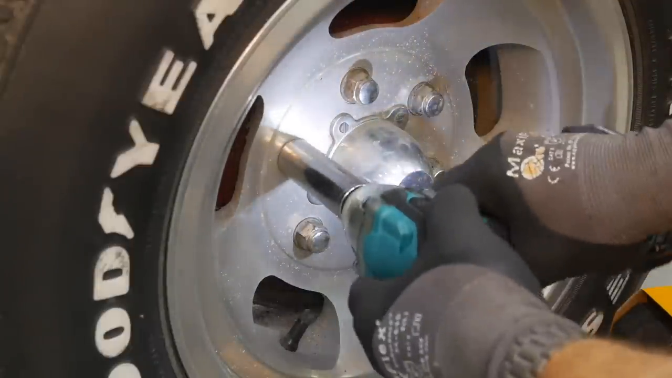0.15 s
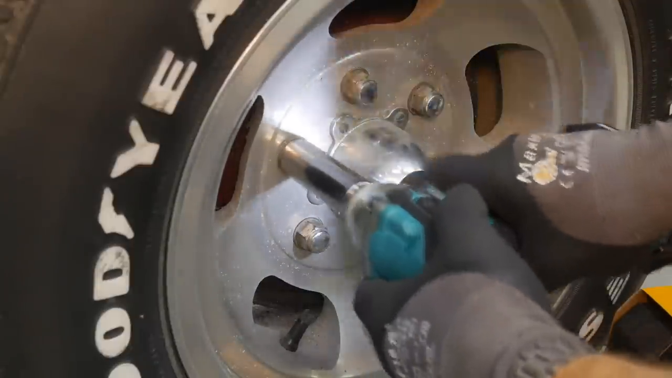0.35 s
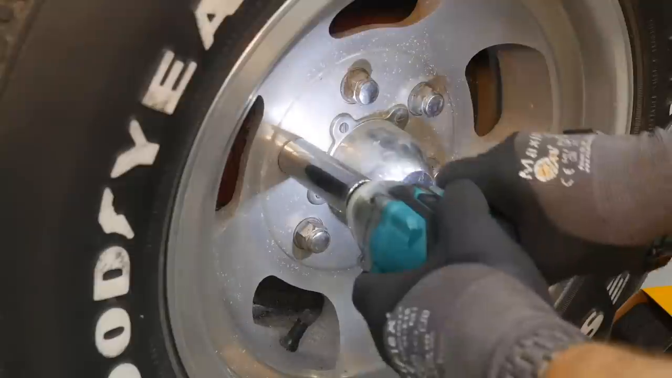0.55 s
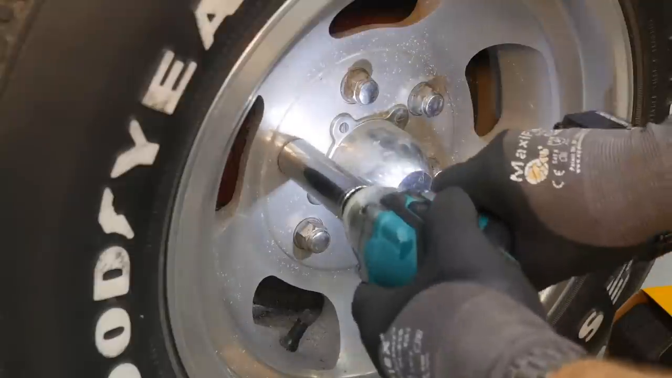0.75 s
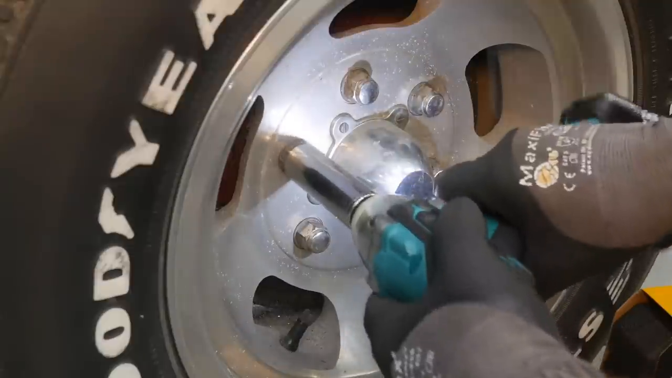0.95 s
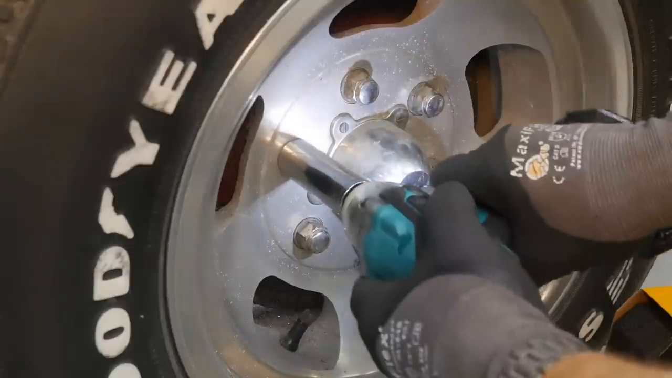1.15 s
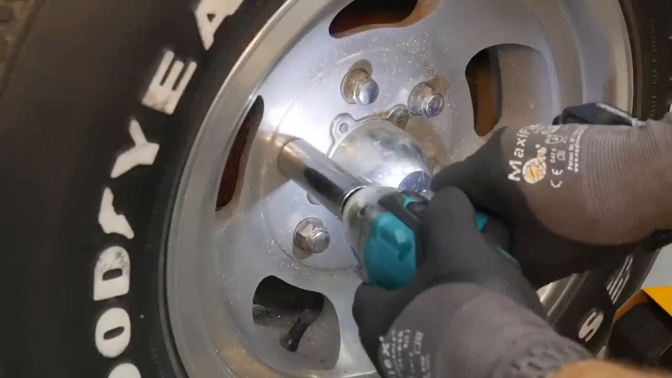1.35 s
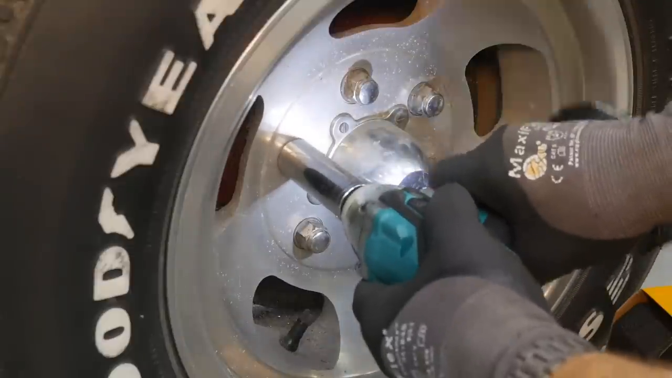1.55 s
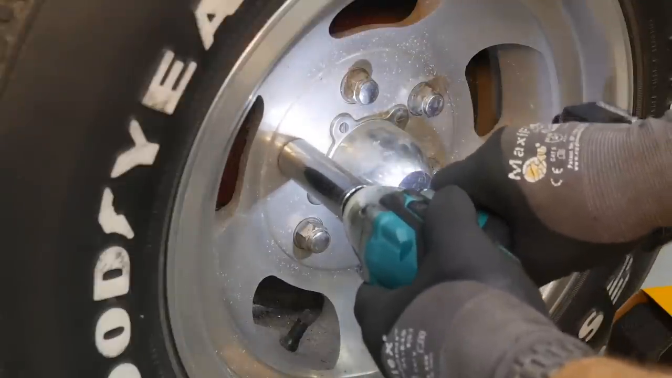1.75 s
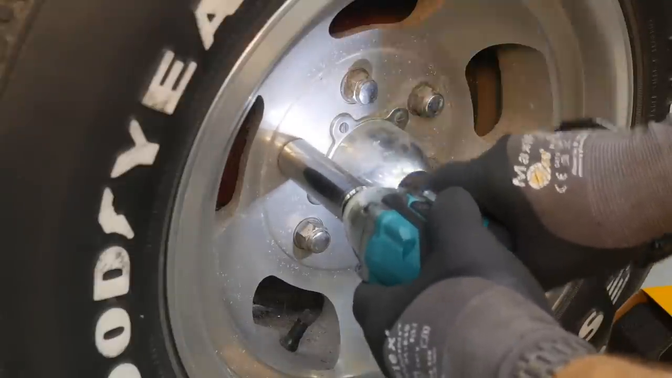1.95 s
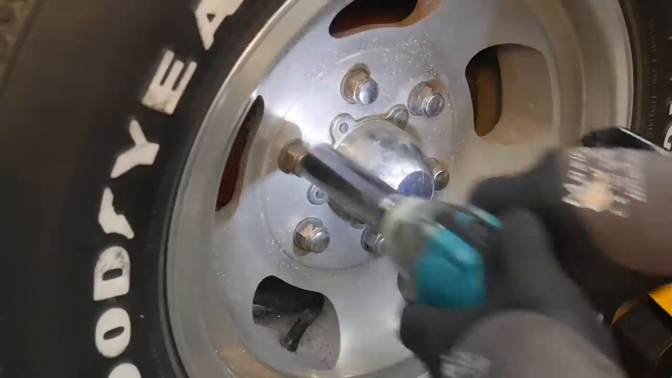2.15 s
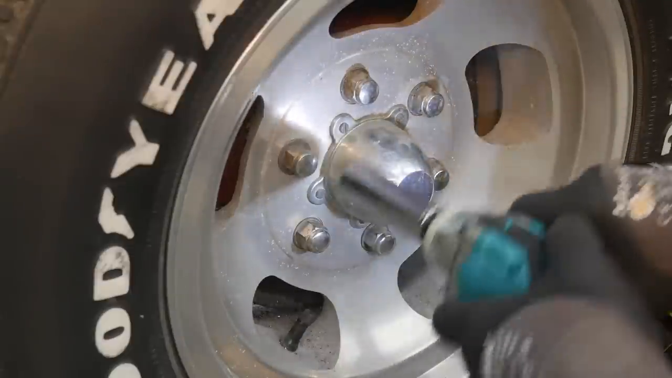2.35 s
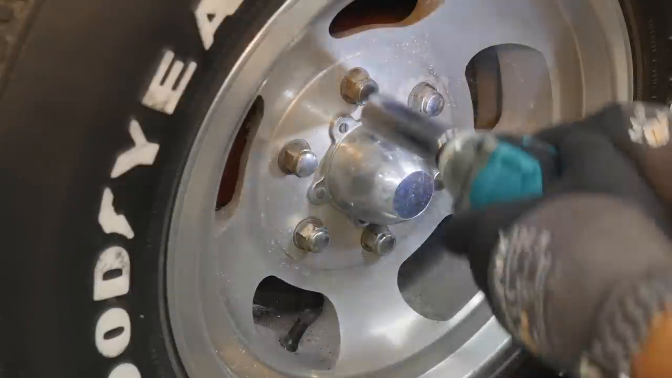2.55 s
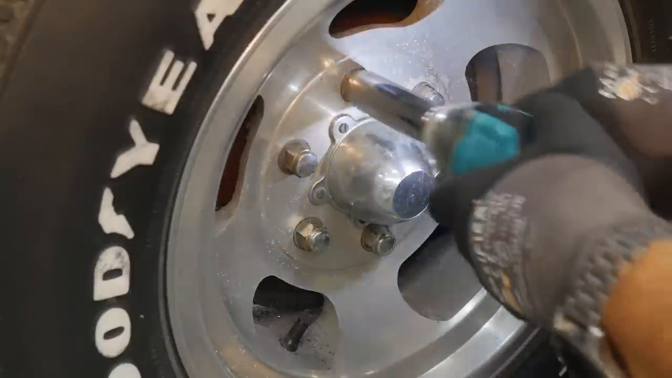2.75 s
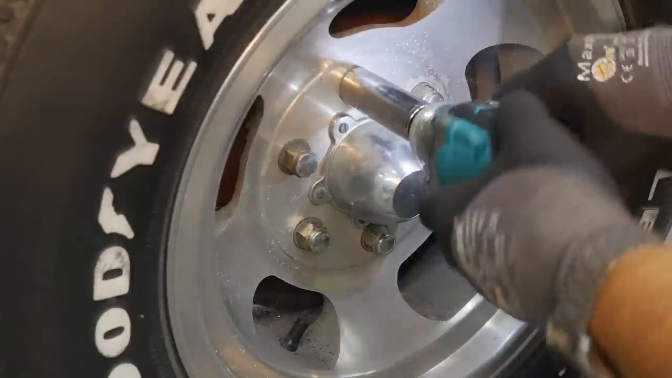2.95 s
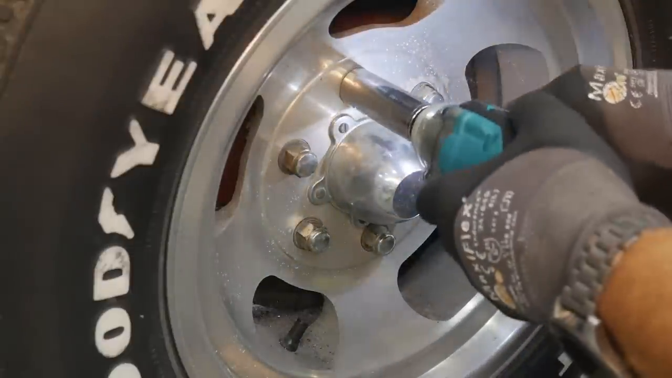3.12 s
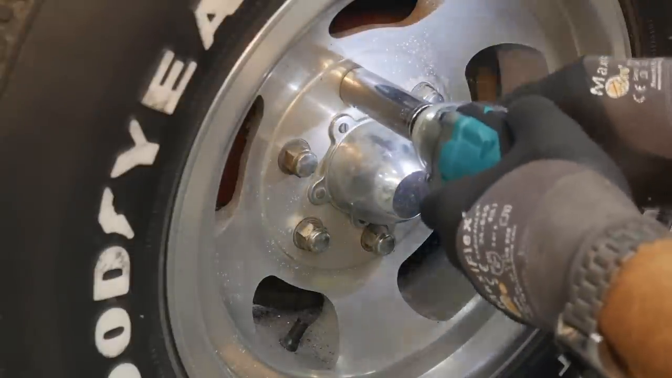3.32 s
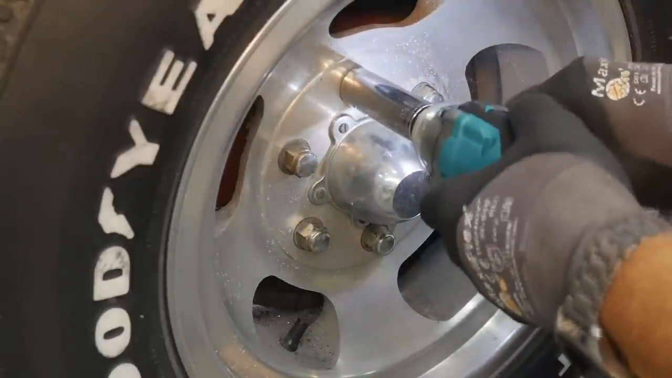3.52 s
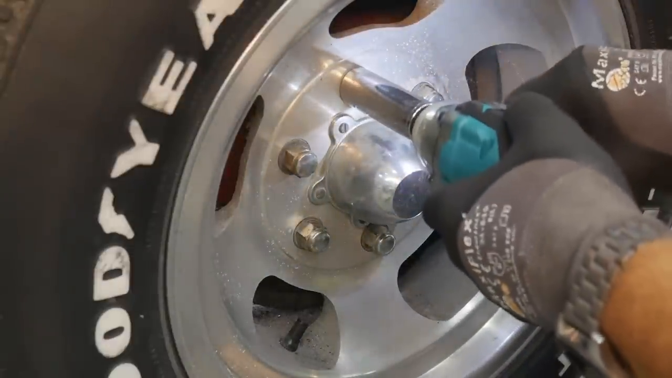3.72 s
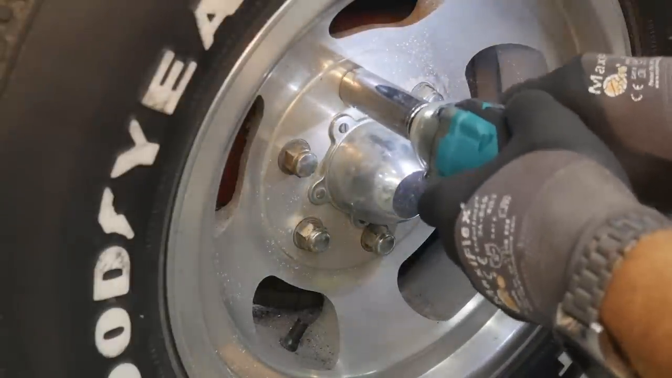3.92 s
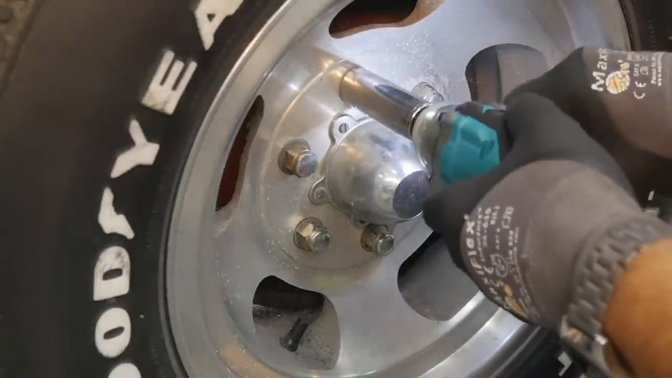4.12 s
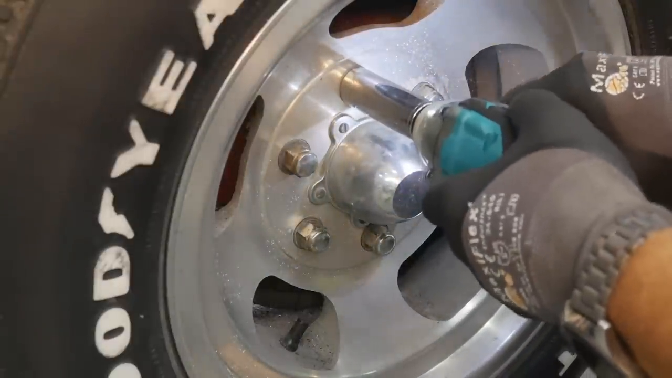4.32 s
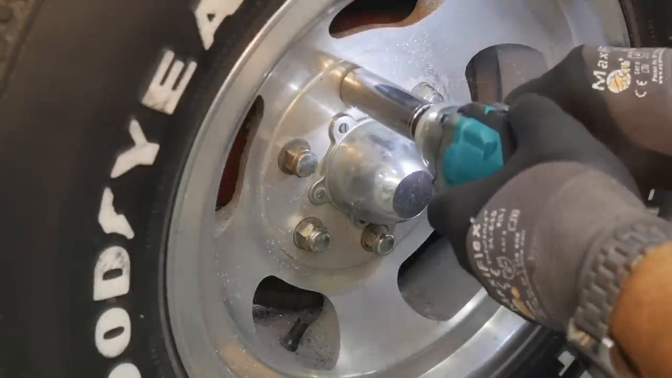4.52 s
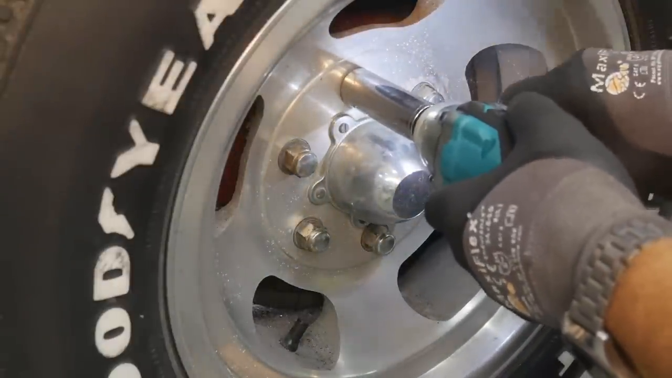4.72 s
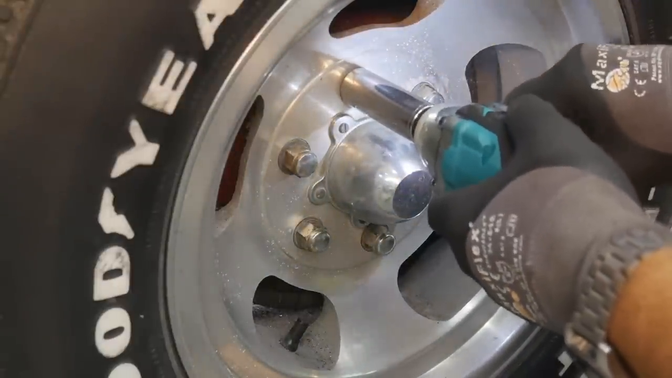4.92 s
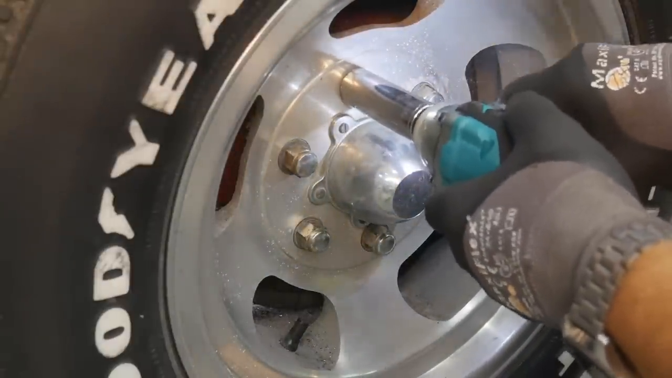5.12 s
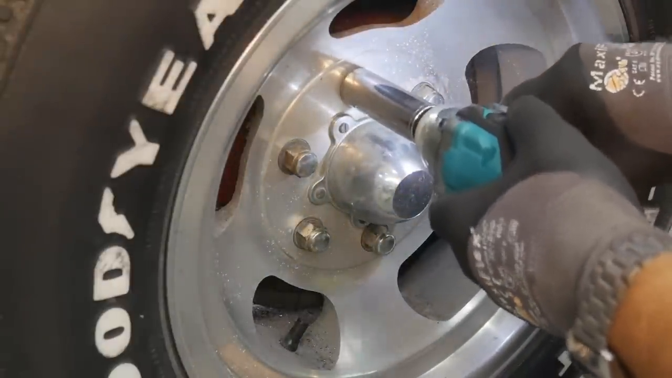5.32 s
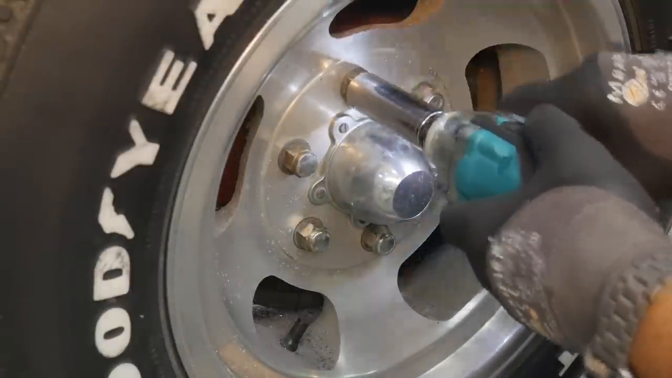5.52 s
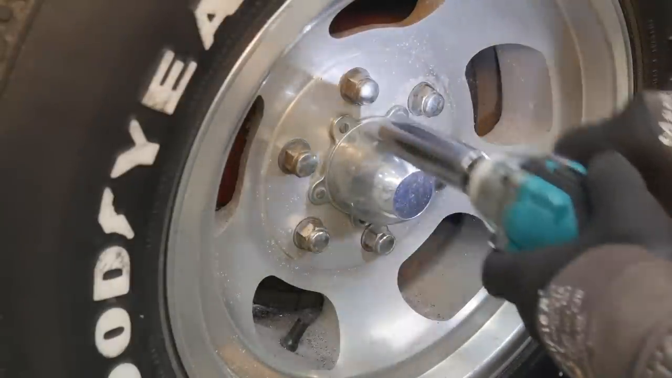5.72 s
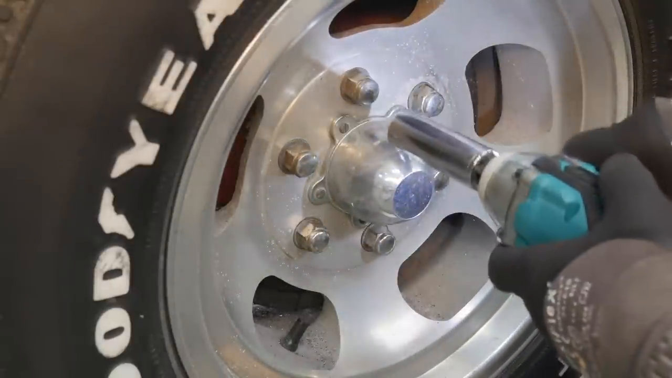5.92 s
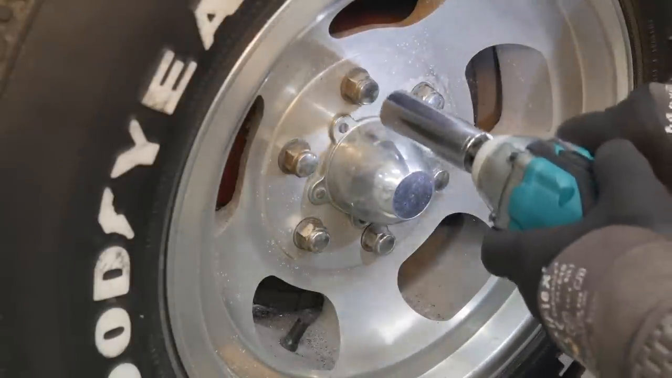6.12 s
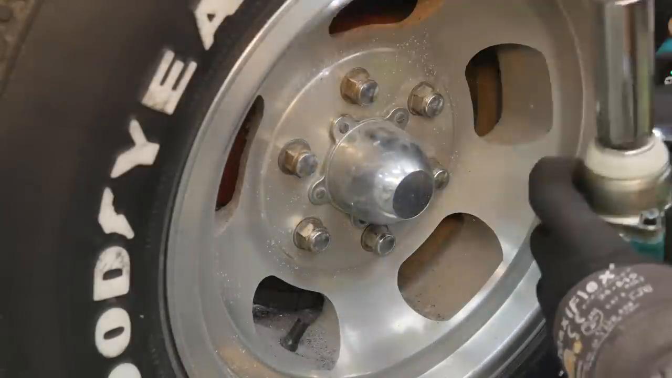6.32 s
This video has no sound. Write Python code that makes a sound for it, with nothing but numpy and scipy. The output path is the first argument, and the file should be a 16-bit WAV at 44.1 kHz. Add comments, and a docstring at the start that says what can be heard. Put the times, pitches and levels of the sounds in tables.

```python
"""Impact wrench on a wheel

A cordless impact wrench tightens two nuts of an alloy wheel, in four and then six short bursts, in a workshop.
Filtered grains of metal contact, pulsed by the hammer, make the clatter; socket, wheel and rim are resonances.
Decaying noise tails throw the bursts back from the room. Between the nuts the socket pings and knocks
as it is pulled off and seated again: short noise ticks, hollow body modes and decaying sines.
A faint falling groan at the start, motor whine, glove rubs, room air and faint tones fill in the rest."""
import sys
import numpy as np
from scipy import signal
from scipy.fft import rfft, irfft
from scipy.io import wavfile

SR = 44100
rng = np.random.default_rng(int(sys.argv[2]) if len(sys.argv) > 2 else 0)


def to_wav(s):
    """Save 16-bit WAV."""
    ch = np.atleast_2d(s).T  # columns
    pcm = np.round(np.clip(ch, -1, 1) * 32767)  # PCM
    wavfile.write(sys.argv[1], SR, pcm.astype(np.int16))


N = 280720
TIME = np.arange(N) / SR

# Trigger pulls; the ring moves down from socket to wheel as the nut seats. Blows keep step with phase_s:
# [start_s, end_s, attack_s, force_db (before the swell), thud_db, catch_db, phase_s, blows_per_s,
#  dip_db (between blows), ring_hz, ring_db, treble_db]
BURSTS = [(0.066, .275, 0.0085, -27, -1, -35, 0.088, 35, 0.5, 4230, -1, -7),
          (0.682, 0.955, 0.024, -27.5, .5, -43, 0.7, 30.4, 0.2, 1070, 3.5, -4.5),
          (1.261, 1.516, 0.031, -27, 0, -46.5, 1.45, 35.75, 1.5, 1080, 2, -2),
          (1.672, 1.873, 0.031, -27.5, 0, -47.5, 1.707, 40, 1, 1100, 2, -3.5),
          (3.208, 3.328, 0.082, -25, -1, -32, 3.225, 52.25, 9, 5150, 6, -5.5),
          (3.522, 3.823, 0.03, -27, -4, -32.5, 3.9, 33, 5.5, 3960, 5.5, -5),
          (4.028, 4.236, 0.009, -27, -3.5, -41.5, 4.044, 41.5, 5, 3340, 7, -1.5),
          (4.396, 4.652, 0.014, -26.5, -3, -38, 4.427, 25.5, 3, 2960, 2, -3),
          (4.818, 5.08, 0.031, -26.5, -2.5, -40, 4.5, 30.6, 3.5, 2040, 4, -2),
          (5.232, 5.465, 0.02, -27, -3.5, -32.5, 5.26, 24.7, 2.5, 1900, 6, -.5)]
# Modes of anvil and socket under load: [pitch_hz, width_hz, first_nut_db, second_nut_db]
SOCKET_MODES = [(410, 28, 4, -10), (1300, 75, -3, -22), (1710, 120, 1, -21.5), (2425, 30, -24, -5.5),
                (3170, 68, 6, -3.5), (3595, 72, 2, 8.5), (3830, 56, 4.5, -9.5), (4430, 100, 5.5, 8.5),
                (4570, 100, 3, -11.5), (4900, 68, 9.5, 9), (6650, 240, 0.5, 3), (8720, 350, 9, -3),
                (10300, 190, 2, -0.5), (11410, 160, -12, -18.5), (12200, 440, 1, -13)]


def amp(db):
    """Decibels to gain."""
    return 10 ** (np.asarray(db) / 20)


def unit(x):
    """Scales to rms 1."""
    return x / np.sqrt(np.mean(x ** 2) + 1e-20)


def unit_energy(x):
    """Scales to energy 1, so that an impulse response keeps the level of what drives it."""
    return x / np.linalg.norm(x)


def read(points, hz):
    """Reads a table on a log-frequency axis."""
    f, value = np.transpose(points)
    return np.interp(np.log(hz + 1), np.log(f), value)


def add(mix, s, sound):
    """Mixes a sound in at s seconds."""
    part = mix[max(round(s * SR), 0):][:len(sound)]
    part += sound[:len(part)]


def noise(spectrum, size):
    """Noise of rms 1 with the given spectrum."""
    white = rfft(rng.standard_normal(size))
    gain = amp(read(spectrum, np.fft.rfftfreq(size, 1 / SR)))
    return unit(irfft(white * gain, size))


def decay(t, t60):
    """Exponential decay that falls by 60 dB in t60 seconds."""
    return np.exp(-np.log(1000) * t / t60)


def ring(hz, t60, t):
    """One dying mode."""
    return np.sin(2 * np.pi * hz * t) * decay(t, t60)


def causal(gain, size=4096):
    """The sharpest impulse response that has this gain on the bins of an FFT."""
    both_sides = np.r_[gain, gain[-2:0:-1]]
    log_gain = np.log(np.maximum(both_sides, 1e-5))
    minimum_phase = np.exp(np.conj(signal.hilbert(log_gain)))
    return irfft(minimum_phase[:size // 2 + 1])


def contacts(size, per_s=9000, spread_db=-1.0):
    """Dense tiny metal contacts of uneven strength and random sign."""
    hits = rng.random(size) < per_s / SR
    strength = amp(spread_db * rng.standard_normal(size))
    return unit(hits * rng.choice([-1, 1], size) * strength)


def room_tail(spectrum, build_s=0.019):
    """A diffuse echo of energy 1 that builds up softly and dies at its own rate in each band."""
    # Reverberation of the workshop: [pitch_hz, t60_s]
    room_decay = [(60, 0.43), (200, 1), (450, 0.86), (1400, 0.94), (3000, 0.91), (5500, 0.84), (8000, 0.68),
                  (11000, 0.59), (16000, 0.24)]
    hz, t, bands = signal.stft(noise(spectrum, size=SR * 3 // 2), SR, nperseg=256)
    bands = bands * decay(t, read(room_decay, hz)[:, None])
    tail = signal.istft(bands, SR, nperseg=256)[1]
    tail *= 1 - np.exp(-TIME[:len(tail)] / build_s)
    return unit_energy(tail)


def workshop(waver_hz=1.5, waver_db=6.0, fade_s=.06, air_db=-67.5):
    """Shaped noise for room air, and faint sine tones with a slight random waver in pitch and level."""
    # Colour of the room air: [pitch_hz, density_db (per Hz)]
    air_spectrum = [(20, -16.5), (50, -6), (90, -4.5), (150, -7), (250, -12), (450, -8.5), (700, -12),
                    (1000, -19.5), (1600, -20.5), (3000, -32.5), (6000, -31), (15500, -35.5)]
    # Faint tones, before they waver; the one near 402 Hz is the rim singing:
    # [start_s, end_s, pitch_hz, level_db]
    faint_tones = [(0, 3.8, 148, -76), (0, 4.6, 402.6, -74.5), (5.7, 6.4, 780, -73.5)]
    out = amp(air_db) * noise(air_spectrum, N)
    for start, end, hz, db in faint_tones:
        drift, swell = (noise([(1, 0), (6, 0), (30, -80)], N) for _ in range(2))
        fade = np.clip(np.minimum(TIME - start, end - TIME) / fade_s, 0, 1)
        level = amp(db + waver_db * swell) * fade
        tone = np.sin(2 * np.pi * np.cumsum(hz + waver_hz * drift) / SR)
        out += level * np.sqrt(2) * tone
    return out


def falling_groan(rough=.15, overtone=0.57, rise_s=.01):
    """A faint falling groan at the start: a tone and its octave, roughened by fast pitch noise."""
    # The groan; a negative hold starts the decay ahead of the sound, which lowers its level:
    # [start_s, first_hz, last_hz, glide_s, level_db, hold_s, t60_s]
    groan = (0, 468.5, 129.5, 0.5, -62, -0.5, 1.8)
    start, first_hz, last_hz, glide_s, db, hold_s, t60 = groan
    out, t = np.zeros(N), TIME[:SR // 2]
    hz = last_hz + (first_hz - last_hz) * np.exp(-(t / glide_s) ** 2)
    wobble = noise([(1, 0), (80, 0), (300, -40)], len(t))
    angle = 2 * np.pi * np.cumsum(hz * (1 + rough * wobble)) / SR
    level = amp(db) * (1 - np.exp(-t / rise_s)) * decay(np.maximum(t - hold_s, 0), t60)
    add(out, start, level * unit(np.sin(angle) + overtone * np.sin(2 * angle)))
    return out


def motor(start_hz=7600, end_hz=8400, whine=.35):
    """The motor spins up before the hammer catches: a rising whine over the whirr of the gears."""
    # Spin-ups, which grow towards their level: [start_s, end_s, level_db]
    spin_ups = [(.002, 0.033, -49.5), (0.659, 0.686, -47.5), (1.246, 1.268, -42.5), (3.147, 3.207, -55)]
    out = np.zeros(N)
    for start, end, db in spin_ups:
        progress = np.linspace(0, 1, max(round((end - start) * SR), 2))
        hz = start_hz + (end_hz - start_hz) * progress
        tone = np.sin(2 * np.pi * np.cumsum(hz) / SR)
        gears = noise([(200, 6), (1500, -8), (4000, 3.5), (8000, -9.0), (14000, -30.0)], len(progress))
        add(out, start, amp(db) * np.sqrt(progress) * (gears + whine * tone))
    return out


def rim(shake, nut):
    """The long, clean modes of the rim sing on after whatever shakes it."""
    # Rim modes: [pitch_hz, t60_s, first_nut_db, second_nut_db]
    rim_modes = [(402, 2.6, -35.5, -33.5), (580, 0.79, -27.5, -37.5), (1302, 0.59, -23.5, -46),
                 (1357, 1.3, -31.5, -40), (1430, 1.7, -25.5, -39)]
    t = TIME[:SR * 3 // 2]
    modes = [amp(db[nut]) * unit(ring(hz, t60, t)) for hz, t60, *db in rim_modes]
    return signal.fftconvolve(shake, sum(modes) / np.sqrt(len(t)))


def handling(skirt_db=0.0, octave_db=-10.5, tick_db=2, body_db=3.0, clink_db=-12, dulling=.8,
             rim_db=-12, room_db=-16.0, rise_s=0.0013, body_rise_s=0.003):
    """Knocks and pings of the socket as it is seated, caught and pulled off: noise ticks and dying modes."""
    # Socket on nut and wheel, levels before the trims above: [start_s, level_db, hollow_db, brightest_hz, t60_s]
    knocks = [(.025, -47.5, 3, 3810, .04), (.030, -32.5, -4.5, 3800, 0.065), (0.051, -33.5, 4, 2516, 0.07),
              (0.536, -47, -1.5, 1210, 0.056), (.695, -35.5, -1.5, 5970, 0.025),
              (1.261, -36.5, 6.5, 2000, 0.057), (2.652, -53, -2.5, 3500, 0.05), (2.704, -56, 2, 1510, 0.19),
              (2.713, -54.5, 10.5, 4020, 0.057), (2.761, -51, 19, 4000, .056),
              (2.783, -42.5, 7, 2200, 0.043), (2.797, -53.5, 13, 1488, 0.068),
              (2.933, -63.5, -5, 4980, .02), (2.946, -60, 14.5, 4450, 0.033),
              (2.972, -61, -3.5, 1980, 0.095), (3.102, -60, 3.5, 4940, .03),
              (3.137, -54.5, -10, 4470, 0.013), (3.166, -46.5, -7, 3800, 0.089),
              (3.173, -35, -3, 3820, 0.051), (3.192, -38, 1, 3800, .05), (3.203, -41.5, 2.5, 3000, 0.033),
              (4.005, -40, -2, 6000, 0.18), (4.385, -34.5, -9, 4960, 0.027), (4.833, -36, -5, 6000, .03),
              (6.156, -69.5, 2, 1400, 0.16), (6.248, -56.5, -12, 4290, 0.023), (6.256, -73, -6, 4170, .02)]
    # The knock as the hammer first catches: [hollow_db, brightest_hz, t60_s]
    catch_knock = (1.2, 6500, 0.036)
    # Hollow knock of the wrench housing, each mode up to 4 % sharp: [pitch_hz, t60_s, level_db]
    housing_modes = [(430, 0.051, 0.5), (511, 0.036, 7), (577, 0.044, 4.5)]
    # The socket rings freely when it comes loose: [start_s, pitch_hz, level_db, t60_s]
    pings = [(.259, 8600, -32, 0.14), (.94, 8700, -37, 0.15), (2.653, 8620, -46, 0.11),
             (2.671, 8530, -70, .5), (5.429, 8650, -36.5, 0.23), (5.545, 8588, -46, 0.8),
             (6.25, 8640, -78, 0.71)]
    hard_contact_db = -6  # a knock with less hollow body than this is bare metal on metal

    out, t = np.zeros(N), TIME[:SR // 2]
    clink = sum(amp(level) * ring(f, np.log(1000) / (np.pi * width), t)
                for f, width, _, level in SOCKET_MODES)
    catches = [(start, catch_db, *catch_knock) for start, _, _, _, _, catch_db, *_ in BURSTS]
    for s, db, hollow_db, hz, t60 in knocks + catches:
        top_db = octave_db * np.log2(16000 / hz)
        tick = noise([(40, -25), (500, skirt_db), (hz, 0), (16000, top_db)], len(t))
        tick *= decay(t, t60) * (1 - np.exp(-t / rise_s))
        body = sum(amp(level) * ring(f * rng.uniform(1.0, 1.04), body_t60, t)
                   for f, body_t60, level in housing_modes) / 2
        body *= 1 - np.exp(-t / body_rise_s)
        # the harder and less hollow the contact, the more the socket clinks
        dull_db = dulling * max(hollow_db - hard_contact_db, 0)
        add(out, s, amp(db + clink_db - dull_db) * clink)
        add(out, s, amp(db) * (amp(tick_db) * tick + amp(hollow_db + body_db) * body))
    for s, hz, db, t60 in pings:
        damping = np.clip((.3 - t) / .06, 0, 1)  # until a hand damps it
        add(out, s, amp(db) * ring(hz, t60, t) * damping)
    echo = signal.fftconvolve(out, room_tail([(100, -1.0), (3000, 3.5), (16000, -7.0)]))[:N]
    return out + amp(rim_db) * rim(out, 0)[:N] + amp(room_db) * echo


def trigger(age, attack_s, nut):
    """A burst swells, settles as the nut resists and falls on release: force dB, and thud dB against it."""
    start_db, settle_db, settle_s, release_s, release_db = -11.5, -4, 0.15, 0.028, -10
    # the low thud of the recoil comes in later than the clatter and leaves sooner
    thud_start_db, thud_build_s, thud_release_db = (-6.5, -2.5)[nut], 0.032, -6.5
    starting = np.clip(1 - age / attack_s, 0, 1)
    stopping = np.clip(1 - (age[-1] - age) / release_s, 0, 1)
    settling = 1 - np.exp(-age / settle_s)
    force_db = start_db * starting + settle_db * settling + release_db * stopping
    thud_lag_db = thud_start_db * np.exp(-age / thud_build_s) + thud_release_db * stopping
    return force_db, thud_lag_db


def hammering(t, first, rate, dip_db, uneven_db=0.8):
    """Each blow starts a clatter that sags until the next; blows differ randomly in strength."""
    turns = rate * (t - first)
    sag = np.interp(turns % 1, [0, .1, .6, .9, 1], [1, 0, .2, .9, 1])
    blow = np.floor(turns - np.floor(turns.min())).astype(int)
    strength_db = uneven_db * rng.standard_normal(64)[blow % 64]
    return unit(amp(strength_db - dip_db * sag))


def burst(row, nut, split_hz=1700, treble_hz=6500, ring_octaves=0.57, stop_s=.0073, echo=0.17, echo_s=0.013):
    """Clatter rings the socket, recoil thuds in the housing; also returns the shaking passed to the wheel."""
    # Clatter of the socket, one list a nut: [pitch_hz, density_db (per Hz)]
    clatter_spectra = [
        [(20, -18.5), (50, 0), (120, 2.5), (420, 0.5), (800, -1), (1400, -5), (2200, -11), (4000, -11),
         (7500, -12.5), (9000, -13), (11500, -7.5), (13500, -15.5), (16000, -16)],
        [(20, -7), (50, -1), (120, -1), (380, 0), (800, -2.5), (1400, -5.5), (2200, -9), (4000, -10),
         (7500, -10.5), (9000, -7.5), (11500, -10), (13500, -13), (16000, -19)],
    ]
    start, end, attack_s, force_db, thud_db, _, phase_s, rate, dip_db, ring_hz, ring_db, treble_db = row
    age = np.arange(0, end - start, 1 / SR)
    swell_db, lag_db = trigger(age, attack_s, nut)
    drive = contacts(len(age), per_s=16000, spread_db=2.5) * hammering(start + age, phase_s, rate, dip_db)
    drive *= amp(force_db + swell_db) * np.clip((age[-1] - age) / stop_s, 0, 1)

    # a broad ring hump, sharper socket modes within it, and a treble tilt
    hz = np.fft.rfftfreq(4096, 1 / SR)
    hump = amp(ring_db * np.exp(-(np.log2((hz + 1) / ring_hz) / ring_octaves) ** 2))
    modes = sum(amp(db[nut]) ** 2 / (1 + (2 * (hz - f) / width) ** 2) for f, width, *db in SOCKET_MODES)
    tilt_db = treble_db * hz ** 2 / (hz ** 2 + treble_hz ** 2)
    colour = amp(read(clatter_spectra[nut], hz) + tilt_db) * np.sqrt(hump + modes * hump ** 2)

    # clatter above the split, recoil below it with its own random signs
    low_share = 1 / (1 + (hz / split_hz) ** 8)
    high = causal(colour * np.sqrt(1 - low_share))
    low = causal(colour * np.sqrt(low_share))
    sound = signal.fftconvolve(drive, unit_energy(high))
    recoil = drive * rng.choice([-1, 1], len(age)) * amp(thud_db + lag_db)
    sound += signal.fftconvolve(recoil, unit_energy(low))

    # the dish of the wheel returns close reflections
    dish = contacts(len(hz)) * np.exp(-TIME[:len(hz)] / echo_s)
    dish = echo * unit_energy(dish)
    dish[0] = 1  # direct sound
    sound = signal.fftconvolve(sound, unit_energy(dish))
    shake = signal.fftconvolve(drive, unit_energy(causal(hump)))
    return start, sound, shake


def wrench(nut, rows, wash_db, wheel_db):
    """All bursts on one nut; the ringing wheel is heard through the echo of the workshop."""
    # What wheel and room send back, one list a nut: [pitch_hz, density_db (per Hz)]
    wash_spectra = [
        [(30, -8.5), (150, -13), (400, -8.5), (900, -4.5), (1800, -1.5), (3000, -3), (5000, -7), (7500, -8.5),
         (10500, -6), (13000, -9.5), (16000, -15)],
        [(30, 0.5), (150, -5.5), (400, -3.5), (900, -2.5), (1800, -1.5), (3300, 0.5), (5000, -5), (7500, -4),
         (10500, -2.5), (13000, -6.5), (16000, -7)],
    ]
    # Wheel and hub over the wash, before wheel_db: [pitch_hz, width_hz, first_nut_db, second_nut_db]
    wheel_modes = [(402, 14, -3, -7.5), (575.3, 17, 17.5, 8), (870, 9.1, 4.5, -6), (1364, 61, 7.5, 5),
                   (1420, 42, 4.5, -5), (1805, 17, 4, 0), (2400, 51, -10, 3.5), (3680, 170, 6, 4),
                   (4470, 230, 6, 7)]
    out, size = np.zeros(N), 2 * SR
    hz = np.fft.rfftfreq(size, 1 / SR)
    wheel = sum(amp(db[nut] + wheel_db) / (1 + 2j * (hz - f) / width) for f, width, *db in wheel_modes)
    for row in rows:
        s, sound, shake = burst(row, nut)
        plain, ringing = (rfft(room_tail(wash_spectra[nut]), size) for _ in range(2))
        wash = irfft(plain + ringing * wheel, size)
        add(out, s, sound)
        add(out, s, rim(shake, nut))
        add(out, s, amp(wash_db) * signal.fftconvolve(shake, wash))
    return out


def gloves(rise_s=0.0053):
    """Gloves shift on the grip: dull noise rubs that start quickly and die away."""
    # Rubs: [start_s, level_db, t60_s]
    rubs = [(2.79, -54, 0.27), (2.99, -68, .4)]
    out, t = np.zeros(N), TIME[:SR // 2]
    for s, db, t60 in rubs:
        rub = noise([(40, -22.0), (150, 2.0), (400, -3.5), (900, -12), (3000, -35.5), (12000, -52)], len(t))
        add(out, s, amp(db) * rub * (1 - np.exp(-t / rise_s)) * decay(t, t60))
    return out


def scene():
    """Both nuts, the handling and the room, heard from one point."""
    first_nut = wrench(0, BURSTS[:4], wash_db=-6.5, wheel_db=-1.5)
    second_nut = wrench(1, BURSTS[4:], wash_db=-8.5, wheel_db=-3.0)
    mono = first_nut + second_nut + handling() + motor() + falling_groan() + gloves() + workshop()
    return np.array([mono, mono])


def record(dry):
    """One central, practically mono sound with a very faint side signal, then the band limit."""
    # Level of the side signal: [pitch_hz, side_db (against mid)]
    side_levels = [(50, -33), (1500, -39.5), (5000, -64), (15000, -55.5)]
    scatter = contacts(size=512)
    side = signal.fftconvolve(dry[0], unit_energy(scatter))[:N]
    side = irfft(rfft(side) * amp(read(side_levels, np.fft.rfftfreq(N, 1 / SR))), N)
    low_pass = signal.firwin(511, 15700, window=("kaiser", 9), fs=SR)  # edge in Hz
    return signal.oaconvolve(dry + np.array([side, -side]), low_pass[None], "same")


dry = scene()
out = record(dry)
to_wav(out)
```